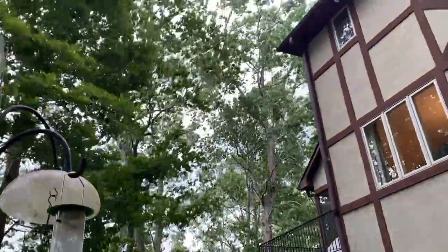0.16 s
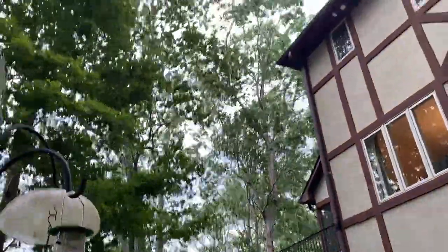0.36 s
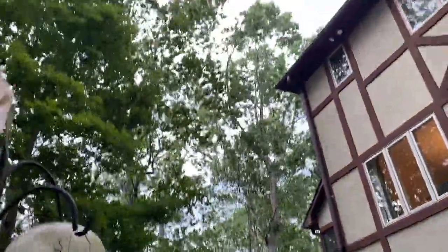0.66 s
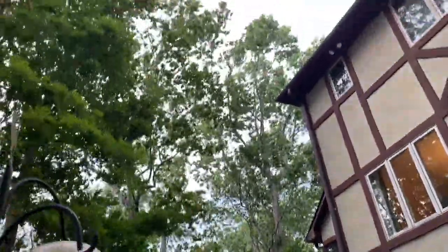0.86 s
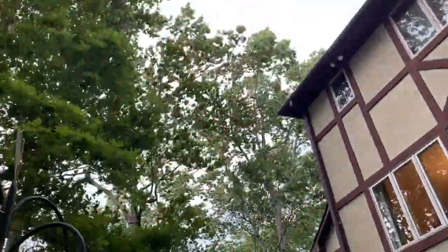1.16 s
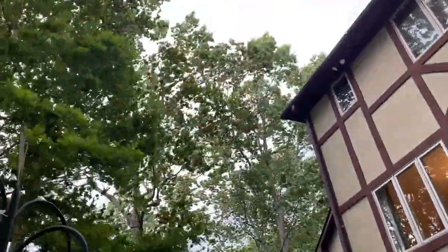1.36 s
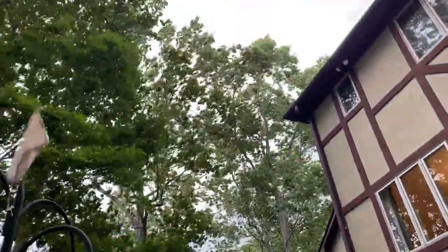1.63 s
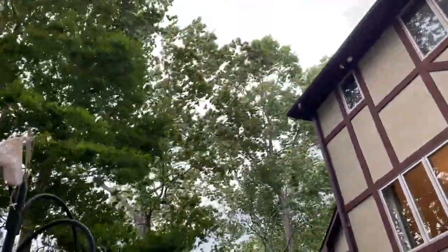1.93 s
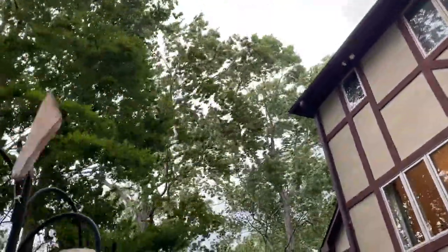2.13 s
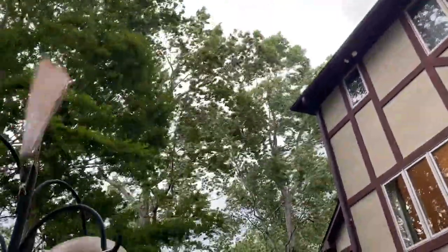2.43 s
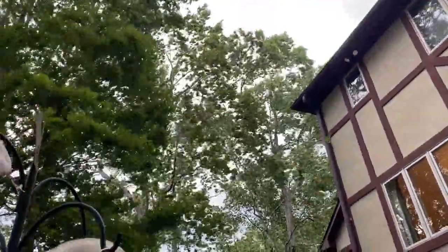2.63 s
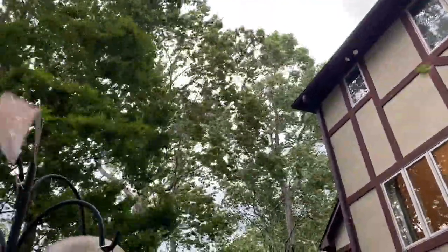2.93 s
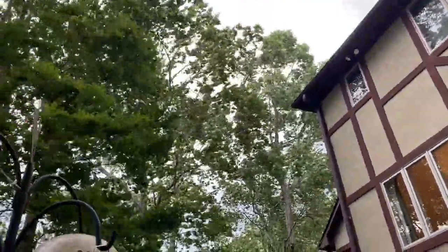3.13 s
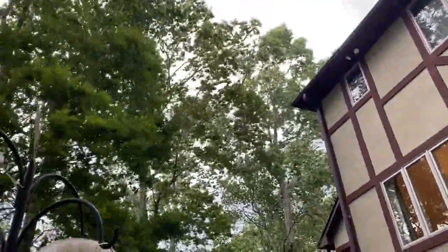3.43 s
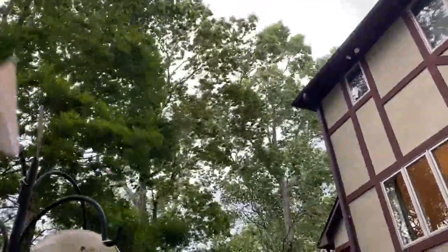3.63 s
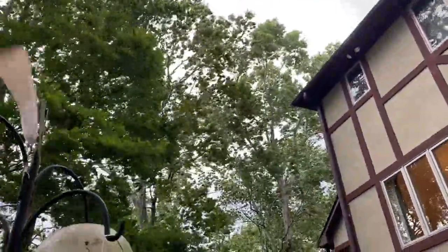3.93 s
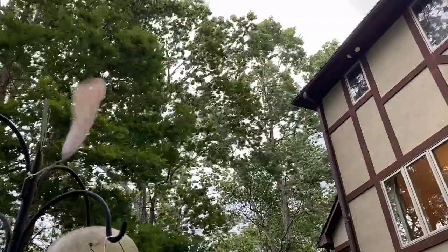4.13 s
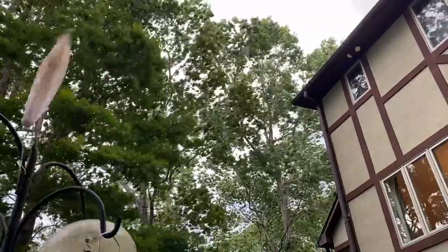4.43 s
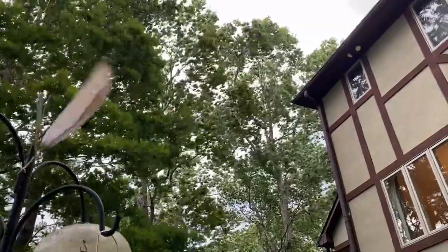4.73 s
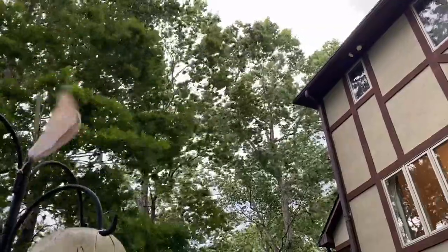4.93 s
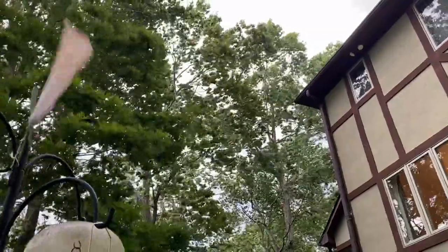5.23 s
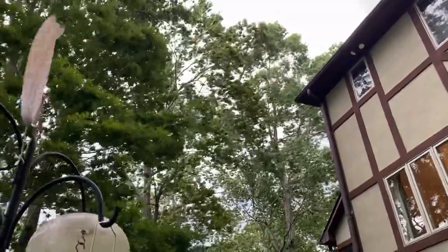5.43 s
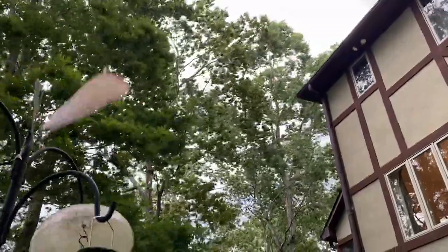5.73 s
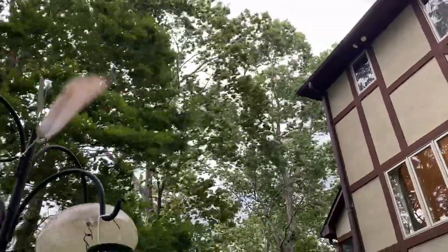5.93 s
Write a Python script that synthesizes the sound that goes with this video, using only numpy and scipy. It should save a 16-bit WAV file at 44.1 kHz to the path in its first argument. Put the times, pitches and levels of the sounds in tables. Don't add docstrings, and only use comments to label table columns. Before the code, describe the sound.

Outdoors beside a house, strong wind tumbles straight over a phone's microphones. Low rumble swells and drops, ragged flutter bursts on top, and short puffs and heavy thumps hit irregularly. Behind it, tall trees hiss smoothly and grow slightly fuller. It starts calmer, gets rough after about one second, and stays gusty with the hardest slap just before four. A few grit-like ticks land close by.

```python
import sys
import numpy as np
from scipy import signal
from scipy.fft import rfft, irfft
from scipy.io import wavfile
from scipy.ndimage import uniform_filter1d, minimum_filter1d

SR = 44100
rng = np.random.default_rng(int(sys.argv[2]) if len(sys.argv) > 2 else 0)


def amplitude_ratio(level_db):
    exponent = np.asarray(level_db, float) / 20
    return 10 ** exponent


def store_wav(level_fs):
    pcm = np.round(np.clip(np.atleast_2d(level_fs), -1, 1) * 32767)
    wavfile.write(sys.argv[1], SR, pcm.T.astype(np.int16))


N = 268083
T = np.arange(N) / SR
HZ = np.fft.rfftfreq(N, 1 / SR)

# time in seconds, level in dB.
HISS_LEVEL = [
    (0.0, -33.5),
    (0.54, -32),
    (2.27, -30),
    (2.64, -31),
    (3.03, -30),
    (3.42, -31),
    (5.54, -29),
    (6.08, -29.5),
]
# frequency in Hz, density in dB per Hz.
LEAF_COLOUR = [(60, 0), (150, 6.5), (400, 6), (800, -1), (1500, 4), (2500, 1), (4000, -1), (5500, -2.5),
               (7000, -5.5), (10000, -8.5), (14000, -13.5), (16000, -22)]
# frequency in Hz, density in dB per Hz.
RUMBLE_COLOUR = [(15, -40), (28, -12), (45, -0.5), (65, 4.5), (90, 2), (140, -9.5), (220, -15.5),
                 (400, -59)]
# frequency in Hz, density in dB per Hz.
FLUTTER_COLOUR = [(60, -32), (120, -0.5), (200, -1.5), (400, -3.5), (700, -7), (1100, -11.5), (1800, -23),
                  (3000, -34), (6000, -64)]
# start in seconds, peak in dB, length in ms.
TICKS = [(1.4654, -17, 5), (2.0464, -15, 5), (2.8624, -10, 4), (2.9188, -16, 5), (2.9700, -4.5, 5.6),
         (3.1025, -14, 4), (3.1985, -15, 4), (3.6494, -21, 5), (5.712, -12, 4), (5.789, -10, 6.6),
         (5.868, -9, 5), (5.913, -14, 4)]
# start in seconds, peak in dB.
DULL_PUFFS = [(.058, -12), (.632, -13), (.694, -12), (.923, -12.5), (1.09, -11), (1.6, -12), (2.239, -12),
              (2.401, -5), (2.596, -10.5), (2.672, -10), (2.839, -7.5), (3.151, -6), (3.272, -.5),
              (4.343, -10), (3.365, -8), (3.483, -9), (3.512, -8), (3.651, -8.5), (3.984, -8), (4.129, -7),
              (4.161, -7), (4.198, -11.5), (4.228, -9), (4.409, -10), (4.654, -11), (4.719, -9),
              (4.878, -5.5), (5.078, -8), (5.207, -8.5), (5.738, -9.5)]
# start in seconds, peak in dB.
BRIGHT_PUFFS = [(.22, -10.5), (.331, -12), (1.409, -12), (1.466, -13), (1.75, -9), (1.802, -13),
                (1.848, -3.5), (1.89, -8), (2.048, -11), (2.727, -16), (2.786, -15), (2.858, -1),
                (3.01, -5.5), (3.197, -8), (3.234, -5), (3.862, -11.5), (3.883, -7), (4.014, -11.5),
                (4.033, -10.5), (4.086, -11), (4.526, -17), (4.824, -6.5), (4.845, -13), (4.923, -10.5),
                (5.057, -3.5), (5.144, -17), (5.4, -15), (5.554, -6.5), (5.602, -8.5), (5.629, -7.5)]
# start in seconds, peak in dB, length in ms.
THUMPS = [(2.417, -2, 11.5), (.157, -9, 12), (.333, -12.5, 22), (.63, -4, 13.5), (.993, -10, 9),
          (1.257, -8, 15), (1.606, -11.5, 13), (1.671, -4, 7.4), (1.793, 2.5, 14.7), (1.934, -2, 11.3),
          (2.05, -3.5, 15), (2.244, -7.5, 17), (2.401, -4, 7.3), (2.853, -5, 15), (2.929, -11, 14),
          (2.977, -17, 8.9), (3.165, -5, 15), (3.269, -3, 15), (3.805, 7, 8.5), (3.879, -6, 14),
          (3.926, -3, 7.8), (4.222, 0.5, 4.8), (4.414, -14, 14), (4.514, -5.5, 13), (4.628, -5.5, 8.7),
          (4.716, -6, 11), (4.94, -7.5, 13), (5.213, -7, 15), (5.55, -4, 14.5), (5.789, -12, 13)]
# time in seconds, strength in dB, reach of the flutter into the treble in dB.
LULL_WIND = [(0, -36, -3), (.35, -29, 6), (.6, -29, -16), (.85, -31, 3.5), (1.24, -24.5, 3.5),
             (1.7, -32, 3), (1.8, -30, -2.5), (2.1, -32, 7), (2.42, -31, -4), (2.6, -29, 4), (3.05, -26, 2),
             (3.35, -29, -5), (3.65, -28, 3.5), (4.1, -30, 2.5), (4.3, -28, -12), (4.72, -33, -3),
             (4.85, -31, 8.5), (6.08, -30, 3.5)]
# top in seconds, rumble in dB, rise in ms, fall in ms.
ROLLS = [(.1, -19, 55, 110), (.27, -21.5, 180, 110), (.66, -20, 40, 160), (1.25, -12.5, 15, 200),
         (1.47, -13.5, 120, 62), (1.69, -19, 200, 30), (1.77, -18, 25, 80), (1.95, -17, 150, 280),
         (2.08, -17, 274, 60), (1.13, -20, 60, 70), (2.42, -12, 40, 95), (2.62, -15.5, 40, 100),
         (2.73, -14, 80, 42), (2.86, -15, 110, 100), (3.06, -14.5, 450, 65), (3.26, -15, 170, 210),
         (3.52, -14, 30, 24), (3.78, -15, 220, 150), (4.1, -12, 160, 12), (4.18, -8.5, 28, 20),
         (4.43, -17, 67, 110), (4.55, -10.5, 36, 33), (4.66, -14, 22, 22), (4.74, -12.5, 20, 26),
         (4.86, -16, 60, 320), (5.11, -12, 81, 28), (5.23, -13, 40, 47), (5.35, -17, 45, 33),
         (5.67, -12, 340, 30), (5.84, -17.5, 250, 500)]
# top in seconds, flutter in dB, rise in ms, fall in ms.
FLURRIES = [(.1, -26, 170, 370), (.34, -24, 140, 35), (.55, -24.5, 200, 30), (.76, -23, 380, 40),
            (1.24, -22, 430, 480), (1.47, -16.5, 97, 92), (1.64, -23.5, 300, 120), (1.76, -16, 23, 45),
            (1.92, -12, 51, 85), (2.06, -20.5, 150, 74), (2.42, -20.5, 35, 470), (2.67, -18.5, 30, 170),
            (2.86, -22, 85, 85), (3.05, -19, 970, 130), (3.31, -15.5, 175, 117), (3.67, -21.5, 400, 600),
            (3.83, -20.5, 100, 220), (4.05, -22.5, 550, 50), (4.13, -12.5, 10, 72), (4.44, -19.5, 175, 56),
            (4.55, -14, 33, 33), (4.66, -18, 44, 38), (4.725, -18, 16, 57), (4.825, -22, 25, 280),
            (5.07, -20.5, 430, 70), (5.24, -22.5, 50, 300), (5.35, -16, 81, 31), (5.42, -22.5, 70, 500),
            (5.66, -19, 480, 160), (5.89, -22.5, 87, 270)]
# frequency in Hz, left-right likeness from 0 to 1,
# lead of the right in radians, left-right balance in dB.
PORTS_IN_WIND = [(40, .88, .3, 0), (170, .86, .6, 0), (350, .84, .9, 0), (550, .62, 1.1, -.4),
                 (800, .5, 1.3, -.4), (1300, .4, 2.1, -.4), (1800, .45, 3.1, -.4)]
# frequency in Hz, left-right likeness from 0 to 1,
# lead of the right in radians, left-right balance in dB.
PORTS_IN_HISS = [(300, .6, .5, 0), (1000, .15, .1, -.4), (1900, .15, .1, -.6), (2400, .4, -.1, .3),
                 (2900, .5, -.6, 3), (4200, .72, -.25, 2.8), (5300, .3, -.05, 3.6), (6000, .42, .2, 2),
                 (6500, .8, -.2, 1.2), (7000, .97, 0, .2), (9000, .999, 3.14, 0), (11100, .999, 6.28, 0),
                 (13250, .999, 9.42, 0), (15350, .999, 12.57, 0)]
# time in seconds, frequency in Hz below which the bass is mono.
MONO_BELOW = [
    (0, 8),
    (1.2, 25),
    (1.4, 140),
    (1.7, 244),
    (2.6, 315),
    (3.4, 340),
    (4.6, 335),
    (5.1, 380),
    (5.5, 405),
    (6.08, 450),
]

FLUTTER_UNDER_DB = -4
SWELL_DB = 10
DULL_TREBLE_DB, BRIGHT_TREBLE_DB, PUFF_MS, PUFF_KICK = -19, -5.5, 9.9, 8.5
TURN_MS, TURN_SHARE = 1.75, 0.092


def evened(x):
    return x / np.sqrt(np.mean(x ** 2) + 1e-20)


def read(points, hz):
    f, *columns = np.transpose(points)
    return [np.interp(np.log(hz + 1), np.log(f + 1), c) for c in columns]


def coloured(x, spectrum):
    return irfft(rfft(x) * evened(amplitude_ratio(read(spectrum, HZ)[0])), N)


def wander(low_hz, top_hz):
    band = 1 / (1 + (HZ / top_hz) ** 2) / (1 + (low_hz / (HZ + .01)) ** 2)
    return evened(irfft(rfft(rng.standard_normal((2, N))) * band, N))


def patchy(x, depth_db, bins, frames):
    z = signal.stft(x, SR, nperseg=512)[2]
    patches = rng.standard_normal(z.shape[1:])
    patches = uniform_filter1d(patches, bins, 0)
    patches = uniform_filter1d(patches, frames, 1)
    return evened(signal.istft(z * amplitude_ratio(depth_db * evened(patches)), SR, nperseg=512)[1][:, :N])


def steadied(x, seconds, share):
    span = round(seconds * SR)
    power = uniform_filter1d(uniform_filter1d(x[0] ** 2, span), span)
    return evened(x / (abs(power) + .02) ** (share / 2))


def smeared(x, turns, about_hz):
    phase = turns * (np.log(HZ + 30) - HZ / about_hz * np.exp(-HZ / 4000))
    return irfft(rfft(x) * np.exp(-2j * np.pi * phase), N)


def ported(x, ports):
    same, lead, balance_db = read(ports, HZ)
    a, b = rfft(x)
    half = np.arccos(np.clip(same, 0, 1)) / 2
    tilt = amplitude_ratio(balance_db / 2) * np.exp(-.5j * lead)
    left = (np.cos(half) * a + np.sin(half) * b) * tilt
    right = (np.cos(half) * a - np.sin(half) * b) / tilt
    return irfft([left, right], N)


def bursts(times, levels_db, lengths_ms, kicks):
    out, t = np.zeros((2, N + 4000)), np.arange(4000) / SR
    noise = rng.standard_normal(out.shape)
    for s, db, ms, kick in zip(times, levels_db, lengths_ms, kicks):
        at = round(s * SR)
        shape = (1 - np.exp(-t / 0.002)) * np.exp(-t / (max(ms, 2) / 1000))
        out[:, at:at + 4000] += amplitude_ratio(db) * shape * noise[:, at:at + 4000]
        out[:, at + 60] += amplitude_ratio(db) * kick * np.sign(noise[:, at]) * [1, .5]
    return out[:, :N]


def swells(rows, lull_db):
    s, db, rise_ms, fall_ms = np.transpose(rows)[:, :, None]
    coarse = T[::64]
    ms = 1000 * (coarse - s)
    away = np.maximum(-ms / np.maximum(rise_ms, 5), ms / np.maximum(fall_ms, 5))
    tops_db = db - SWELL_DB * away
    return np.maximum(np.interp(T, coarse, tops_db.max(0)), lull_db)


def leaves():
    noise = patchy(rng.standard_normal((2, N)), depth_db=.4, bins=8, frames=12)
    level_db = np.interp(T, *np.transpose(HISS_LEVEL)) + 5.0
    return coloured(noise * amplitude_ratio(level_db), LEAF_COLOUR)


def ticks():
    s, peak_db, ms = np.transpose(TICKS)
    scratches = bursts(s, peak_db - 3.5, ms, np.full_like(s, 3.3))
    return coloured(scratches, [(800, -11), (1800, 4.5), (3500, -8), (5500, -9), (8000, -40)])


def puffs():
    s, peak_db = np.transpose(DULL_PUFFS + BRIGHT_PUFFS)
    treble_db = np.repeat([DULL_TREBLE_DB, BRIGHT_TREBLE_DB], [len(DULL_PUFFS), len(BRIGHT_PUFFS)])
    ms, kick = np.full_like(s, PUFF_MS), np.full_like(s, PUFF_KICK)
    body = bursts(s, peak_db - 5.5, ms, kick)
    body = coloured(body, [(150, -16), (300, 3), (700, 0.5), (1200, -7), (3000, -66)])
    treble = bursts(s, peak_db + treble_db - 3.0, ms, 0.47 * kick)
    treble = coloured(treble, [(500, -38), (1000, 6.5), (1800, 4), (3000, -13), (6000, -39)])
    return smeared(body + treble, turns=1.2, about_hz=698)


def thumps():
    out, t = np.zeros((2, N + 4000)), np.arange(4000) / SR
    for (s, peak_db, ms), (start, side) in zip(THUMPS, rng.random((len(THUMPS), 2))):
        first_turn_ms = max(0.771 * (TURN_MS + TURN_SHARE * ms), 1)
        turns = 1.51 * np.log(1 + t * 1000 / first_turn_ms / 1.51) + start
        u = t / (max(ms, 3) / 1000)
        shape = (1 - np.exp(-t / 0.002)) * np.exp(-u ** 0.88)
        at = round((s + 0.0048) * SR)
        push = amplitude_ratio(peak_db) * shape * np.sin(2 * np.pi * turns)
        out[:, at:at + 4000] += push * [[1], [side - .5]]
    return out[:, :N]


def eddies(level_db, spectrum, lumps_db, lumps_hz, kicks_per_s, kick_share, patch_db, steady_s):
    lumps = wander(lumps_hz / 2.7, lumps_hz)
    kicks = evened(rng.standard_normal((2, N)) * (rng.random(N) < kicks_per_s / SR))
    noise = np.sqrt(1 - kick_share) * rng.standard_normal((2, N)) + np.sqrt(kick_share) * kicks
    noise *= amplitude_ratio(lumps_db * (0.9 * lumps[0] + 0.35 * lumps[::-1]))
    air = coloured(patchy(noise, patch_db, bins=4, frames=4), spectrum)
    return steadied(air, steady_s, share=.75) * amplitude_ratio(level_db)


def buffeting():
    s, *columns = np.transpose(LULL_WIND)
    wind_db, reach_db = (np.interp(T, s, c) for c in columns)
    rumble_db = swells(ROLLS, wind_db)
    flutter_db = swells(FLURRIES, wind_db + FLUTTER_UNDER_DB)
    rumble = eddies(rumble_db + 1.0, RUMBLE_COLOUR, lumps_db=1.3, lumps_hz=30.2,
                    kicks_per_s=110, kick_share=0.45, patch_db=2.0, steady_s=0.036)
    flutter = eddies(flutter_db + 1.5, FLUTTER_COLOUR, lumps_db=2.7, lumps_hz=40,
                     kicks_per_s=400, kick_share=0.56, patch_db=2.0, steady_s=0.03)
    treble = signal.sosfilt(signal.butter(2, 800, "high", fs=SR, output="sos"), flutter)
    flutter = flutter + (amplitude_ratio(reach_db) - 1) * treble
    return smeared(rumble, turns=1.5, about_hz=80.6) + smeared(flutter, turns=1.5, about_hz=459)


def scene():
    hiss = ported(leaves(), PORTS_IN_HISS)
    wind = ported(ticks() + puffs() + thumps() + buffeting(), PORTS_IN_WIND)
    return hiss + wind


def band_limit(x):
    return signal.sosfilt(signal.butter(12, 15740, fs=SR, output="sos"), x)


def record(dry):
    mid, side = (dry[0] + dry[1]) / 2, (dry[0] - dry[1]) / 2
    hz, t, z = signal.stft(side, SR, nperseg=2048)
    octaves = np.log2((hz[:, None] + 1) / np.interp(t, *np.transpose(MONO_BELOW)))
    guard = amplitude_ratio(np.clip(38 * (octaves - .45), -70, 0))
    kept = guard * (hz[:, None] < 14480)
    side = signal.istft(z * kept, SR, nperseg=2048)[1][:N]
    limited = np.array([mid + side, mid - side])
    peak = -minimum_filter1d(-abs(limited).max(0), 161)
    gain = (1 + (peak / .9) ** 8) ** (-1 / 8)
    limited *= uniform_filter1d(gain, 120)
    return band_limit(limited)


dry = scene()
out = record(dry)
store_wav(out)
```